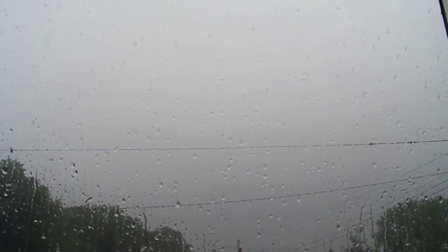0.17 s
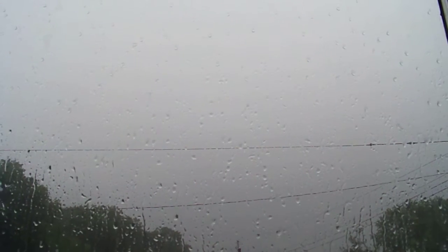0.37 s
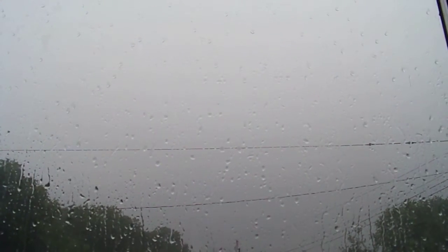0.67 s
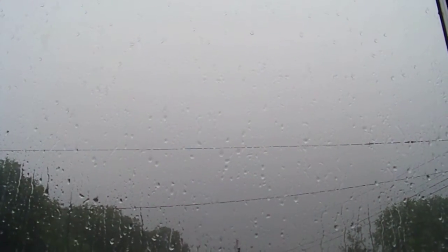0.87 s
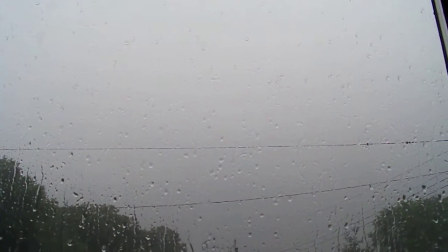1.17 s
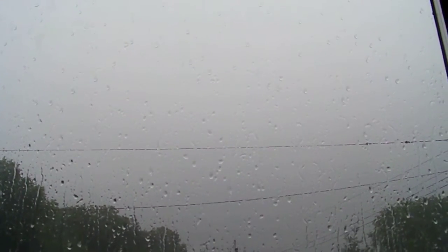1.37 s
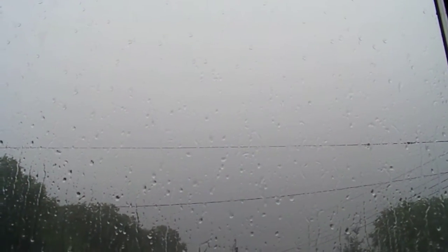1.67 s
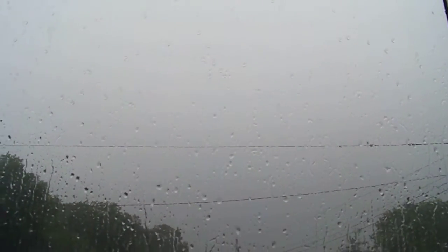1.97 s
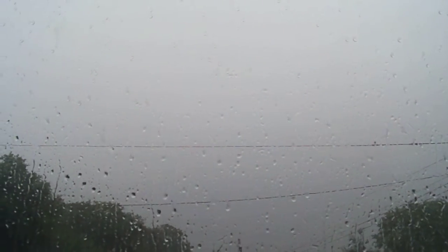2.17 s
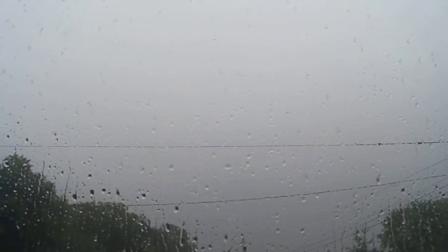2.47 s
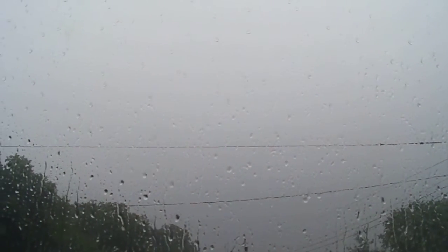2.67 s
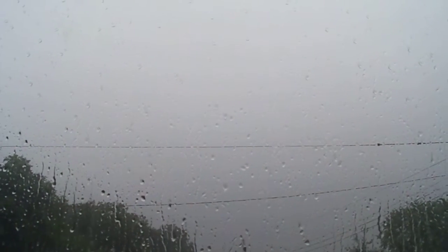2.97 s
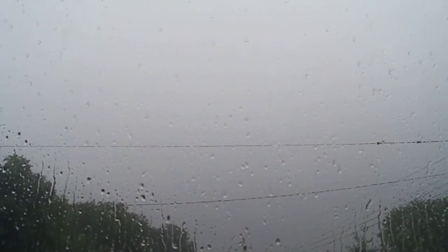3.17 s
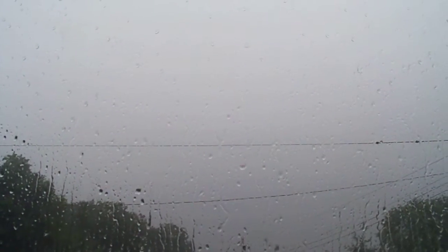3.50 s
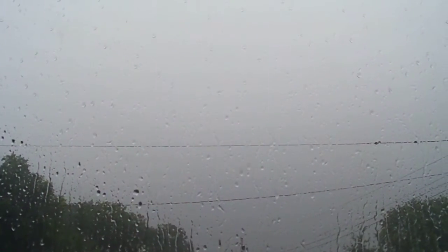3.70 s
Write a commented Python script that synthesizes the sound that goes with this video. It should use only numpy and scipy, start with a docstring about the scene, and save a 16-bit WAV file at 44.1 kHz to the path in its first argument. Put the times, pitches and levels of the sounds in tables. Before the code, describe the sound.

Steady rain heard from behind a closed window, with scattered drops tapping the sill, pinging the frame to the left and ticking on glass, over low thunder that is strongest early; slightly dull microphone indoors.

```python
"""Steady rain is heard from behind a closed window, over surges of distant thunder.
Thunder is three bands of low noise that swell and fade; the wash is noise coloured by pane and room.
Close drops tap on the sill, ping on the frame to the left and tick on the glass: short rings and noise bursts.
Spray, patter and tiny ringing droplets fall at random; a microphone dulls the treble."""
import sys
import numpy as np
from scipy import signal
from scipy.fft import rfft, irfft
from scipy.io import wavfile
from scipy.ndimage import uniform_filter1d

SR = 44100
rng = np.random.default_rng(int(sys.argv[2]) if len(sys.argv) > 2 else 0)


def transcribe(u):
    """Save the signal u as a 16-bit wav file named by the first command-line argument.

    u: samples, shape (n,) or (channels, n), limited to [-1, 1]; the rate is SR.
    q: integer samples, one column per channel.
    """
    v = np.clip(np.atleast_2d(u).T, -1, 1)
    q = np.round(v * 32767).astype(np.int16)
    wavfile.write(sys.argv[1], SR, q)


N = 169344
TIME = np.arange(N) / SR
HZ = np.maximum(np.arange(N // 2 + 1) * SR / N, 1)
ATTACK_S = 0.0004  # time constant of a drop's rise

# colour of a drop's hard tick on the glass: f/Hz, level/dB
GLASS_TICK_COLOUR = [(500, -14.5), (1500, -9), (2500, -0.5), (4300, -2), (5500, -5.5), (7500, -20),
                     (9000, -7)]
# colour of its bright splash: f/Hz, level/dB
GLASS_SPLASH_COLOUR = [(2000, -21.5), (4500, -31.5), (6300, -3), (7200, -7), (9000, -6)]
# colour of drops on the sill: f/Hz, level/dB
SILL_COLOUR = [(250, -33.5), (550, -6.5), (850, 3.5), (1100, -0.5), (1400, -3), (1900, -7), (3500, -13.5),
               (7000, -26)]
# stereo balance of the wash and the patter: f/Hz, left minus right/dB
RAIN_BALANCE = [(100, -2), (600, -0.5), (1100, -1.3), (1600, 0.5), (2200, 3), (3000, 8.5), (4200, 5),
                (5500, -0.5), (7000, -3)]


def from_db(db):
    """Turn decibels into gain."""
    return 10 ** (np.asarray(db) / 20)


def rms_one(x):
    """Scale a signal to an average power of one."""
    return x / np.sqrt(np.mean(x ** 2) + 1e-20)


def in_time(rows):
    """Draw straight lines between timed points, giving a value at every sample."""
    return np.interp(TIME, *np.transpose(rows))


def over_hz(points):
    """Join the points of a spectrum table along a logarithmic pitch scale."""
    hz, value = np.transpose(points)
    return np.interp(np.log(HZ), np.log(hz), value)


def panned(db):
    """Left and right gains for a level difference (left minus right) at constant total power."""
    gains = from_db(np.array([[0.5], [-0.5]]) * db)
    return gains / np.sqrt(np.mean(gains ** 2, axis=0))


def drift(rate_hz):
    """Random wandering with a spread of one; changes faster than the rate fade out."""
    spectrum = rfft(rng.standard_normal(N))
    return rms_one(irfft(spectrum / (1 + (HZ / rate_hz) ** 2), N))


def noise(colour_db, pan_db=0):
    """Coloured stereo noise, alike on both sides in the bass and more diffuse in the treble."""
    # likeness of the two sides: f/Hz, correlation (1 = identical)
    likeness = [(70, 0.98), (140, 0.99), (250, 1), (500, 0.97), (750, 0.95), (1100, 0.88), (1700, 0.22),
                (2800, 0.31), (4500, 0.092), (7000, 0.16)]
    left_lead_s = 0.00013  # the window is off to the left, so the left side leads
    mid, side = rfft(rng.standard_normal((2, N)))
    alike = np.clip(over_hz(likeness), -1, 1)
    shared = np.sqrt(1 + alike) * mid
    opposed = np.sqrt(1 - alike) * side * [[1], [-1]]
    lead = np.exp(2j * np.pi * HZ * left_lead_s * np.array([[1], [0]]))
    spectrum = (shared + opposed) * lead * from_db(colour_db) * panned(pan_db)
    return rms_one(irfft(spectrum, N))


def evened(x, size):
    """Hold a noise's power steady over stretches of about the given number of samples."""
    power = np.mean(x ** 2, axis=0)
    smooth_power = uniform_filter1d(uniform_filter1d(power, size), size)
    return x / np.sqrt(smooth_power + 1e-12)


def impacts(rows):
    """Loudness outline of drops (t/s, level/dB, pan/dB, t60/s): a short crack over a dying tail."""
    crack_db, crack_t60_s = -7.5, 0.018
    power = np.zeros((2, N))
    age = TIME[:SR // 4]  # each drop ends after a quarter of a second
    rise = 1 - np.exp(-age / ATTACK_S)
    crack = from_db(crack_db) * 1000 ** (-age / crack_t60_s)
    for s, db, pan_db, t60 in rows:
        start = int(np.clip(s * SR, 0, N - 1))
        tail = 1000 ** (-age / t60)  # falls by 60 dB in t60 seconds
        shape = rise * (crack + tail)
        # overlapping drops add their powers
        power[:, start:start + len(age)] += (from_db(db) * panned(pan_db) * shape[:N - start]) ** 2
    return np.sqrt(power)


def shower(per_s, t60):
    """Loudness outline of drops falling at random, many small and a few larger."""
    size_spread_db, pan_spread_db = 1, 2
    drops = []
    for when, size, place in rng.random((int(per_s * N / SR), 3)):
        size_db = size_spread_db * min(-np.log(1 - size), 3)
        pan_db = pan_spread_db * (1 - 2 * place)
        drops.append((when * N / SR, size_db, pan_db, t60))
    return rms_one(impacts(drops))


def struck(s, hz, t60, rise_s):
    """One ringing tone that builds up quickly after a blow and dies away."""
    out = np.zeros(N)
    start = int(np.clip(s * SR, 0, N - 1))
    age = TIME[:min(SR // 4, N - start)]
    envelope = (1 - np.exp(-age / rise_s)) * 1000 ** (-age / t60)
    out[start:start + len(age)] = envelope * np.sin(2 * np.pi * hz * age)
    return out


def room_db():
    """Lift in decibels where the pane and the room resonate, as a sum of peaks."""
    # resonances of pane and room: f/Hz, width/Hz, lift/dB
    resonances = [(240, 47, 1), (357.4, 3.9, 14), (420, 18, 3), (543.7, 48, 8), (754, 16, 7.5),
                  (871, 55, 10.5), (1064, 34, 9), (1264, 7.8, 8.5)]
    return sum(db / (1 + (2 * (HZ - hz) / width) ** 2) for hz, width, db in resonances)


def thunder():
    """Low noise in three bands, a boom, a roll above it and a room drone, swells and fades."""
    # deep boom: t/s, level/dB
    boom_level = [(0, -24), (.12, -29), (.2, -37.5), (.35, -39.5), (.42, -24), (.52, -28.5), (.64, -29.5),
                  (.76, -40.5), (.87, -26), (.97, -36), (1.1, -40), (1.62, -36), (1.8, -45), (1.9, -29.5),
                  (1.98, -35.5), (2.1, -41.5), (2.24, -41.5), (2.32, -32.5), (2.55, -39.5), (3.07, -46),
                  (3.3, -43.5), (3.5, -40.5), (3.84, -37)]
    # colour of the boom: f/Hz, level/dB
    boom_colour = [(15, -35), (26, -20.5), (33, -9.5), (40, -4.5), (46, -8), (55, -22), (75, -26.5),
                   (120, -67)]
    # roll above the boom: t/s, level/dB
    roll_level = [(0, -27), (.13, -30.5), (.21, -34), (.32, -33), (.39, -26), (.52, -32), (.62, -34),
                  (.78, -37), (.95, -34), (1.08, -38.5), (1.21, -35), (1.34, -37), (1.5, -41), (1.61, -35),
                  (1.72, -37), (1.94, -37.5), (2.03, -45), (2.14, -39), (2.27, -40), (2.38, -37),
                  (2.5, -44.5), (2.67, -36), (2.95, -45.5), (3.25, -47), (3.5, -33.5), (3.58, -42),
                  (3.8, -34.5)]
    # colour of the roll: f/Hz, level/dB
    roll_colour = [(40, -36), (58, 0), (70, 3), (82, -4.5), (101, 5.5), (132, -5), (163, -12.5), (192, -11),
                   (245, -15.5), (290, -35), (600, -59)]
    # drone at the room's low resonance: t/s, level/dB
    drone_level = [(0, -41), (.08, -34), (.2, -42), (.29, -34.5), (.45, -35), (.61, -39), (.7, -36),
                   (.8, -49), (1.1, -46.5), (1.25, -42), (1.42, -46), (1.55, -41), (1.93, -44.5),
                   (2.04, -34), (2.17, -48.5), (2.5, -49), (2.68, -42), (2.9, -49.5), (3.62, -53.5),
                   (3.77, -36.5), (3.84, -43)]
    # colour of the drone: f/Hz, level/dB
    drone_colour = [(115, -30), (145, -6), (162, -0.5), (178, -8.5), (210, -30), (290, -60)]
    boom = from_db(in_time(boom_level)) * evened(noise(over_hz(boom_colour)), size=3000)
    roll = from_db(in_time(roll_level)) * evened(noise(over_hz(roll_colour)), size=2000)
    drone = from_db(in_time(drone_level)) * evened(noise(over_hz(drone_colour)), size=2500)
    return boom + roll + drone


def wash():
    """Countless far drops merge into noise, coloured by the resonances of pane and room."""
    # colour of the far rain before the resonances: f/Hz, level per Hz/dB
    rain_colour = [(20, -19.5), (120, -6.5), (215, 1.5), (255, 4), (298, -13.5), (340, -4), (420, -2),
                   (620, 0.5), (790, -6), (900, -10.5), (968, -14.5), (1030, -8), (1350, -4.5), (1440, -7),
                   (1600, -6.5), (2100, -10), (3000, -8), (4000, -13.5), (5500, -18), (7100, -22),
                   (9000, -16.5)]
    wash_db, swell_db, flutter_db = -38, 0.27, 0.5
    level_db = wash_db + swell_db * drift(rate_hz=4.5) + flutter_db * drift(rate_hz=35)
    return from_db(level_db) * noise(over_hz(rain_colour) + room_db(), over_hz(RAIN_BALANCE))


def small_drops():
    """Many short noise bursts make a fine spray on the glass and a soft patter on the sill."""
    spray_per_s, spray_db, spray_t60_s = 41, -50, 0.1  # level of its tick part
    patter_per_s, patter_db, patter_t60_s = 80, -50.5, 0.058
    tick = noise(over_hz(GLASS_TICK_COLOUR), pan_db=1)
    splash = from_db(-8) * noise(over_hz(GLASS_SPLASH_COLOUR), pan_db=-5.5)
    spray = from_db(spray_db) * shower(spray_per_s, spray_t60_s) * (tick + splash)
    sill_noise = noise(over_hz(SILL_COLOUR), over_hz(RAIN_BALANCE))
    patter = from_db(patter_db) * shower(patter_per_s, patter_t60_s) * sill_noise
    return spray + patter


def droplets():
    """Tiny drops scattered across the window ring briefly, each at a random pitch."""
    per_s, base_db, spread_db, pan_spread_db = 150, -51.5, 1.5, 9.5
    low_hz, high_hz, t60_s = 1199, 3610, 0.041
    out = np.zeros((2, N + SR // 8))
    age = TIME[:SR // 8]
    decay = (1 - np.exp(-age / ATTACK_S)) * 1000 ** (-age / t60_s)
    for when, pitch, size, place in rng.random((int(per_s * N / SR), 4)):
        hz = low_hz * (high_hz / low_hz) ** pitch
        db = base_db + spread_db * min(-np.log(1 - size), 3)
        gains = from_db(db) * panned(pan_spread_db * (2 * place - 1))
        start = int(when * N)
        out[:, start:start + len(age)] += gains * decay * np.sin(2 * np.pi * hz * age)
    return out[:, :N]


def sill_taps():
    """Heavy drops make a dull noisy splat and a knock; the landing spot favours nearby modes."""
    # heavy drops: t/s, base level/dB, pitch the landing spot favours f/Hz
    taps = [(0.097, -41, 1350), (.113, -42, 1700), (0.432, -37, 1090), (0.651, -38, 1080),
            (.796, -40, 1270), (.822, -40.5, 800), (.906, -41, 870), (.922, -45, 1150),
            (0.935, -32.5, 1190), (1.603, -42, 1150), (1.671, -44, 950), (1.85, -37, 750),
            (2.249, -39, 860), (2.255, -33.5, 1470), (2.259, -37, 760), (2.586, -40, 1100),
            (3.172, -40, 1280), (3.229, -38, 560), (3.239, -36, 800), (3.308, -40, 550), (3.364, -43, 560)]
    # ringing modes of the sill: f/Hz, level over the drop's/dB
    sill_modes = [(548, 9.5), (858, 1.5), (1068, 1), (1265, 0), (1370, -5.5), (1590, -4.5)]
    spot_octaves = 0.24  # distance in pitch at which a mode rings half as strongly
    ring_t60_s, rise_s, splat_t60_s = 0.09, 0.002, 0.093
    # high-pitched spots splash more than low ones
    splat_db, splat_db_per_octave, pivot_hz = -3, 4, 1110
    resonance_share = 0.44  # part of the room's lift that colours a near tap
    knock = np.zeros(N)
    splats = []
    for s, db, spot_hz in taps:
        for hz, mode_db in sill_modes:
            share = 1 / (1 + (np.log2(hz / spot_hz) / spot_octaves) ** 2)
            varied_hz = hz * (1 + rng.normal(0, 0.01))
            knock += share * from_db(db + mode_db) * struck(s, varied_hz, ring_t60_s, rise_s)
        hardness_db = splat_db_per_octave * np.log2(spot_hz / pivot_hz)
        splats.append((s, db + splat_db + hardness_db, 0, splat_t60_s))  # centred
    colour_db = over_hz(SILL_COLOUR) + resonance_share * room_db()
    splat = impacts(splats) * evened(noise(colour_db), size=300)
    return knock + splat  # the one-channel knock goes equally to both sides


def frame_pings():
    """Each drip rings the frame at its own pitch, with a noisy tail as the room's answer."""
    # drips on the frame: t/s, base level/dB, pitch f/Hz
    pings = [(.098, -41, 3005), (0.263, -41, 3130), (.645, -39, 2900), (.795, -36.5, 2820),
             (1.602, -40, 2860), (1.885, -45, 2885), (2.252, -45, 2880)]
    # modes of the frame: multiple of the pitch, level over the drip's/dB
    frame_modes = [(1.001, 2), (1.091, -17)]
    # colour of the room tail: f/Hz, level/dB
    tail_colour = [(600, -32), (1100, -13.5), (1800, -21), (2600, -15), (2870, 8.5), (3150, -12.5),
                   (3600, -28), (7000, -32.5)]
    pan_db, ring_t60_s, rise_s = 12.5, 0.073, 0.002  # to the left
    room_tail_db, room_t60_s = -8.5, 0.19
    ring = np.zeros(N)
    for s, db, hz in pings:
        for multiple, mode_db in frame_modes:
            ring += from_db(db + mode_db) * struck(s, hz * multiple, ring_t60_s, rise_s)
    tail_rows = [(s, db + room_tail_db, pan_db, room_t60_s) for s, db, _ in pings]
    tail = impacts(tail_rows) * noise(over_hz(tail_colour))
    return panned(pan_db) * ring + tail


def glass_ticks():
    """Each drop is a direct click, then noise bursts: a hard tick and a bright splash."""
    # drops on the glass: t/s, base level/dB, brightness (more splash, less tick)/dB,
    # pan (left minus right)/dB, t60/s
    ticks = [(.264, -44, -8, 4, 0.062), (0.534, -36, 13, 2, 0.25), (0.747, -44.5, -5, 0.5, 0.21),
             (.915, -44.5, 2, 0, 0.14), (1.078, -42.5, 4, 3, 0.26), (1.372, -43.5, 2, 1, 0.27),
             (1.451, -44, -4, -1, 0.16), (1.67, -46.5, -7, 10, .09), (1.752, -45, 3, -5, .08),
             (1.907, -41.5, 10, -2, 0.11), (1.983, -40.5, 5, 1, 0.15), (2.092, -43.5, 13, 3, 0.087),
             (2.257, -48, -7, 0, 0.091), (2.573, -39.5, 0, 0, 0.41), (2.627, -49, -8, 0, 0.14),
             (2.771, -52, 0, -2, .1), (3.029, -43, -2, -1, 0.16), (3.454, -47.5, -9, 6, 0.1),
             (3.593, -43, -3, -1, 0.1), (3.699, -48, -5, -2, 0.092)]
    click_db, click_low_hz = 24, 3500  # click over the drop's level, before its bass is removed
    clicks = np.zeros((2, N))
    body_rows, splash_rows = [], []
    for s, db, bright, pan, t60 in ticks:
        clicks[:, int(s * SR)] += from_db(db + click_db) * panned(pan)[:, 0]
        body_rows.append((s, db - bright / 2, pan, t60))
        splash_rows.append((s, db + bright / 2, pan, t60))
    treble_only = signal.butter(2, click_low_hz, "high", fs=SR, output="sos")
    direct = signal.sosfilt(treble_only, clicks + 1e-18)
    body_noise = evened(noise(over_hz(GLASS_TICK_COLOUR), pan_db=4.5), size=150)
    splash_noise = evened(noise(over_hz(GLASS_SPLASH_COLOUR), pan_db=-7), size=150)
    body = from_db(2.5) * impacts(body_rows) * body_noise
    splash = from_db(-3) * impacts(splash_rows) * splash_noise
    return direct + body + splash


def scene():
    """Add up the thunder, the far rain and the near drops."""
    far = thunder() + wash()
    scattered = small_drops() + droplets()
    near = sill_taps() + frame_pings() + glass_ticks()
    return far + scattered + near


def record(dry):
    """A narrow-band microphone: the top drops steeply to a faint shelf and is then cut."""
    mic_top_hz, shelf_db, cutoff_hz = 7277, -25.5, 8750
    steep_drop = signal.butter(N=22, Wn=mic_top_hz, fs=SR, output="sos")
    mic = signal.sosfilt(steep_drop, dry)
    shelf = from_db(shelf_db) * dry
    final_cut = signal.ellip(12, 0.1, 90, cutoff_hz, fs=SR, output="sos")  # 0.1 dB ripple, 90 dB down
    return signal.sosfilt(final_cut, mic + shelf)


dry = scene()
out = record(dry)
transcribe(out)
```